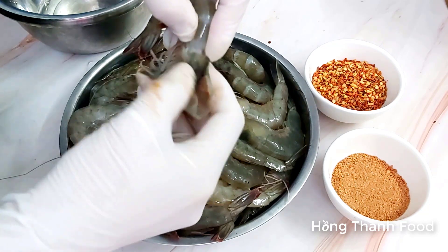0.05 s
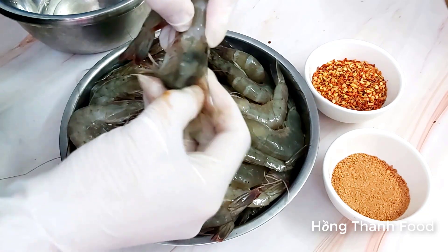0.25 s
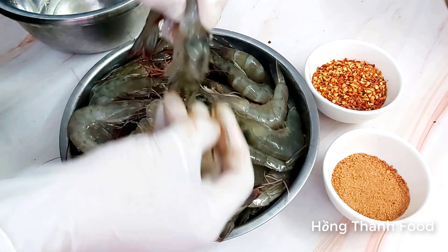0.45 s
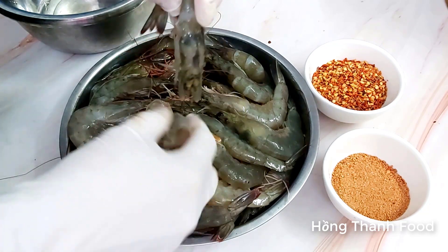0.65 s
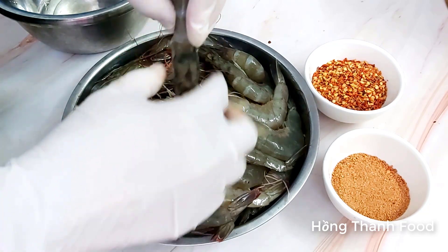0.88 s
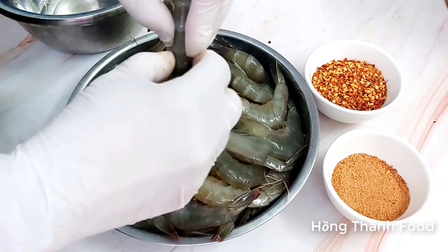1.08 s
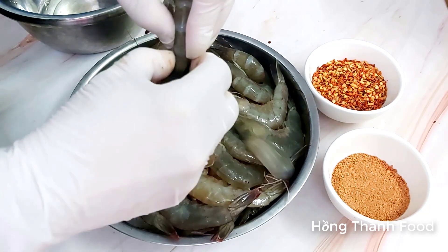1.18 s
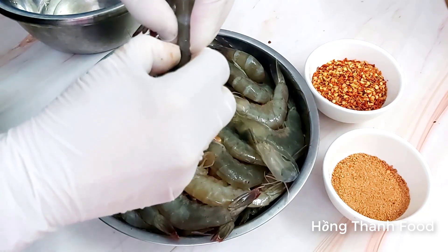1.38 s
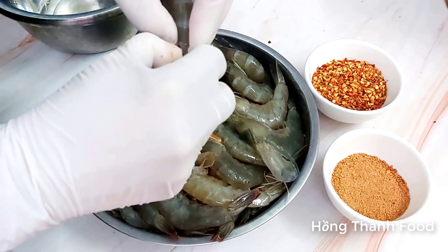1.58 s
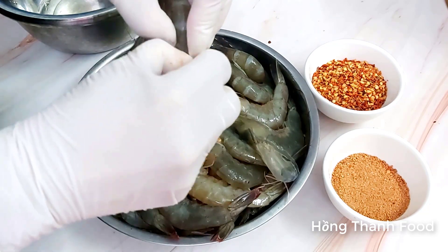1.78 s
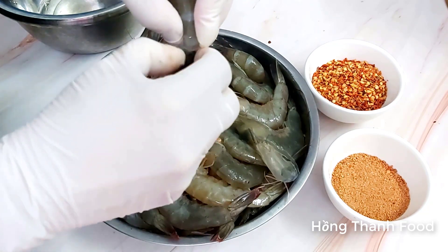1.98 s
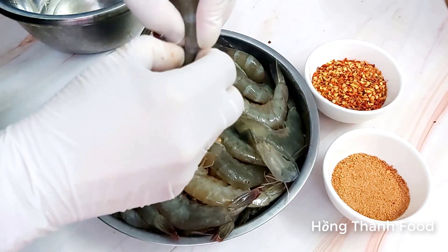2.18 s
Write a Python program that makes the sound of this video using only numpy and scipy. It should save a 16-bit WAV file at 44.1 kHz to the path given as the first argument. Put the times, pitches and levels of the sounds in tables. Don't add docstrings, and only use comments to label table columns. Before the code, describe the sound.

Raw shrimp shell cracks sharply as gloved hands twist the head off, then sparse tiny clicks

```python
import sys
import numpy as np
from scipy import signal
from scipy.io import wavfile

SR = 44100
rng = np.random.default_rng(int(sys.argv[2]) if len(sys.argv) > 2 else 0)


def master_out(mix):
    frames = np.transpose(np.atleast_2d(mix))
    ceiling = np.clip(frames, -1, 1)
    pcm = np.round(ceiling * 32767).astype(np.int16)
    wavfile.write(sys.argv[1], SR, pcm)


def voltage_ratio(decibels):
    exponent = np.asarray(decibels, float) / 20
    return 10 ** exponent


N = 99225


def rms_one(x):
    return x / np.sqrt(np.mean(x ** 2) + 1e-20)


def peak_one(x):
    return x / np.max(np.abs(x))


def at_hz(points, hz, column=1):
    points = np.array(points)
    return np.interp(np.log(hz), np.log(points[:, 0]), points[:, column])


def band(x, low_hz, high_hz):
    sos = signal.butter(2, [low_hz, min(high_hz, .47 * SR)], "band", fs=SR, output="sos")
    return signal.sosfilt(sos, x)


def drift(rate_hz):
    pole = np.exp(-80 * np.pi * rate_hz / SR)
    noise = rng.standard_normal(N // 40 + 2002)
    slow = signal.lfilter([1], [1, -2 * pole, pole * pole], noise)[2000:]
    return np.interp(np.arange(N) / 40, np.arange(len(slow)), rms_one(slow))


def ring(clicks, hz, t60_s):
    radius = voltage_ratio(-60 / (t60_s * SR))
    angle = 2 * np.pi * hz / SR
    return signal.lfilter([0, np.sin(angle)], [1, -2 * radius * np.cos(angle), radius ** 2], clicks + 1e-18)


def third_octaves(start_hz, octaves):
    edges_hz = start_hz * 2 ** np.arange(0, octaves, 1 / 3)
    return zip(edges_hz, edges_hz[1:])


# hz, density_db (per Hz)
AIR_SPECTRUM = [(30, -17.5), (120, -8), (350, -13), (700, -23.5), (2500, -32.5), (6000, -45.5),
                (13500, -32), (15800, -45)]
# hz, likeness (0-1)
AIR_LIKENESS = [(40, .5), (100, 0.95), (200, 0.54), (500, 0.22), (2000, .1), (12000, .05)]
# hz, level_db (rms)
HUM_LINES = [(50, -59), (102, -55), (127, -56.5)]


def air():
    level_db, flicker_db, hum_wobble_db = -47.5, .27, 3
    tone, together = 0, drift(2.5)
    white = rng.standard_normal((2, 2, N))
    for k, (low_hz, high_hz) in enumerate(third_octaves(25, 9.6)):
        mid, side = band(white[k % 2], low_hz, high_hz)
        hz = np.sqrt(low_hz * high_hz)
        alike = np.clip(at_hz(AIR_LIKENESS, hz), -1, 1)
        stereo = np.sqrt(1 + alike) * mid + np.sqrt(1 - alike) * side * [[1], [-1]]
        gain_db = at_hz(AIR_SPECTRUM, hz) + flicker_db * (together + drift(8))
        tone = tone + voltage_ratio(gain_db) * stereo
    hum, t = 0, np.arange(N) / SR
    for hz, line_db in HUM_LINES:
        height = voltage_ratio(line_db + 3 + hum_wobble_db * drift(6))
        hum = hum + height * np.sin(2 * np.pi * hz * t + .7 * drift(4))
    return voltage_ratio(level_db) * rms_one(tone) + hum


# time_s, level_db
FINGER_EFFORT = [(0, -64), (.15, -61.5), (.23, -80), (.285, -29), (0.318, -22), (.36, -39.5), (.45, -42.5),
                 (.52, -40), (0.558, -38), (.72, -63), (.85, -61), (1.17, -64.5), (1.24, -62), (1.34, -52),
                 (1.42, -89), (1.62, -74.5), (1.748, -67.5), (2.25, -87)]


def crackle():
    grains_per_s, spread_db, ring_cycles = 3000, 3.5, 4
    sizes = voltage_ratio(spread_db * np.minimum(rng.exponential(1, N), 5)) * rng.choice([-1, 1], N)
    born = rng.random(N) < grains_per_s * voltage_ratio(5 * drift(40)) / SR
    dealt = rng.integers(0, 12, N)
    grains = 0
    for k, hz in enumerate(np.geomspace(3000, 15000, num=12)):
        grains = grains + ring(sizes * born * (dealt == k), hz, ring_cycles / hz)
    effort_db = np.interp(np.arange(N) / SR, *np.transpose(FINGER_EFFORT))
    return voltage_ratio(effort_db) * rms_one(grains)


# start_s, level_db, rise_s, length_s
FAR_THUDS = [
    (.118, -43, 0.0081, 0.012),
    (0.301, -37.5, 0.018, 0.069),
    (0.855, -33, 0.059, 0.076),
]
# hz, width_hz, level_db
THUD_RESONANCES = [(117, 49, -1.5), (154.2, 10, -6.5), (265, 39, -5.5), (330, 47, -11), (394, 37, -11),
                   (490, 13, -16.5), (700, 27, -24), (843, 150, -17), (1095, 100, -18.5)]


def thuds():
    t60_s, side_db = .47, -8
    t, envelope = np.arange(N) / SR, 0
    for start_s, level_db, rise_s, length_s in FAR_THUDS:
        decay_db = -60 * np.maximum(t - start_s - length_s, 0) / t60_s
        envelope = envelope + voltage_ratio(level_db + decay_db) * np.clip((t - start_s) / rise_s, 0, 1)
    white, body = rng.standard_normal((2, N)), 0
    for hz, width_hz, level_db in THUD_RESONANCES:
        resonance = band(white, hz - width_hz / 2, hz + width_hz / 2)
        body = body + voltage_ratio(level_db) / np.sqrt(width_hz) * resonance
    mid, side = body
    return envelope * (rms_one(mid) + voltage_ratio(side_db) * rms_one(side) * [[1], [-1]])


# start_s, peak_db, ring_hz, body_db (re peak), top_db (re peak)
TWIST_SNAPS = [(.1657, -4.5, 4390, -28.5, -1), (.2172, -8, 1600, -12.5, -45.5), (.228, -2.5, 5000, -9, 6),
               (.2335, -16.5, 6000, -25.5, -10), (.2455, -7, 4000, -19, 0.5), (.257, -13, 5000, -16, -3.5),
               (.2725, -19.5, 5000, -16.5, -22.5), (.283, 4.5, 6800, -25, -39),
               (.2846, 8.5, 5300, -21.5, -4), (.296, 3.5, 6500, -45, -15.5),
               (.2995, -11.5, 6000, -34, -1.5), (.3095, 11.5, 7200, -68, 15.5), (.3127, 0, 7000, -29, -30),
               (.315, 2.5, 5500, -17.5, 13), (.368, -12, 5200, -28.5, -13.5),
               (.407, -10.5, 5900, -30.5, 15.5), (.437, -19.5, 7000, -26, -15.5)]
# start_s, peak_db, ring_hz, body_db (re peak), top_db (re peak)
PULL_SNAPS = [(.4574, -1, 6000, -26, 3), (.4593, -2, 9800, -28, 4), (.4611, -4, 7100, -30, 4),
              (.4697, -8, 6800, -24, 0), (.4737, 2, 6300, -16, -3), (.5008, 2, 9000, -10, 3),
              (.5022, -2.5, 6500, -24, 3), (.5034, -4, 6000, -26, 3), (.5078, -9, 6700, -30, 3),
              (.5172, -8, 6700, -30, 3), (.5236, -11, 6300, -26, -5)]
# start_s, peak_db, ring_hz, body_db (re peak), top_db (re peak)
PICK_SNAPS = [(.698, -20, 8800, -39, 14), (.7605, -19.5, 5840, -45, 3), (.7625, -13.5, 10700, -47, -27),
              (.775, -40, 9900, -30, -8), (1.0498, -19.5, 5850, -40, -26.5), (1.0587, -55, 9000, -26, 8),
              (1.1802, -19.5, 8900, -35, 7), (1.234, -25.5, 7500, -24, 13), (1.2405, -31, 9700, -10, 0),
              (1.2495, -31, 5040, -34, -7.5), (1.3103, -22.5, 5700, -15, -12), (1.325, -46, 7000, -18, -21),
              (1.3465, -31.5, 5300, -15, -21), (1.5955, -23.5, 8600, -27, 11),
              (1.6095, -30, 8660, -20, -14.5), (1.7, -33, 7500, -38, 2), (1.8547, -13, 6670, -19, -6),
              (1.856, -21, 4480, -36, -37), (1.8575, -22.5, 6350, -25, -29),
              (1.9525, -32.5, 6190, -35.5, -19)]


def snaps(table):
    snap_s, cracks_per_s, ring_cycles, tick_db = .0005, 10000, 9, -4
    out, t = np.zeros(N + SR), np.arange(512) / SR
    swell = (t / snap_s) * np.exp(1 - t / snap_s)
    for start_s, peak_db, ring_hz, body_db, top_db in table:
        chance, size = rng.random((2, len(t)))
        cracks = .4 * (chance < cracks_per_s / SR) * (2 * size - 1) * swell
        cracks[int(snap_s * SR / 2)] = 1
        plate = peak_one(ring(cracks, ring_hz, ring_cycles / ring_hz))
        body = peak_one(band(band(cracks, 800, 3300), 800, 3300))
        tick = peak_one(band(cracks, 2200, 10000))
        edge = peak_one(band(cracks, 9500, SR))
        burst = plate + voltage_ratio(body_db) * body + voltage_ratio(tick_db + top_db / 2) * tick - voltage_ratio(top_db) * edge
        start = int(start_s * SR)
        out[start:start + len(t)] += voltage_ratio(peak_db) * peak_one(burst)
    return out[:N]


# hz, t60_s, level_db
ROOM_DECAY = [(500, 0.42, -14.5), (1200, 0.19, -13), (2500, 0.14, 4.5), (3600, 0.19, 0), (5000, 0.27, 2.5),
              (7200, 0.24, 4), (11000, 0.14, 5), (15000, 0.17, 3.5)]


def kitchen(x):
    room_db, wall_s, build_s, echo_db = -2.5, .0125, .005, -15
    bowl_db, bowl_t60_s, table_db, table_t60_s = -1.5, .011, -13, .15
    t, room = np.arange(SR // 2) / SR, 0
    white = rng.standard_normal((4, 2, len(t)))
    for k, (low_hz, high_hz) in enumerate(third_octaves(250, 6.4)):
        hz = np.sqrt(low_hz * high_hz)
        gain_db = at_hz(ROOM_DECAY, hz, column=2) - 60 * t / at_hz(ROOM_DECAY, hz)
        room = room + band(white[k % 2], low_hz, high_hz) * voltage_ratio(gain_db)
    room = room * np.clip((t - wall_s) / build_s + 1, 0, 1) ** 2
    table = white[2] * voltage_ratio(-60 * t / table_t60_s) * np.clip(t / .00033, 0, 1)
    bowl = band(white[3], 4880, SR) * voltage_ratio(-60 * t / bowl_t60_s)
    reply = voltage_ratio(room_db) * rms_one(room) + voltage_ratio(table_db) * rms_one(table) + voltage_ratio(bowl_db) * rms_one(bowl)
    reply = reply / np.sqrt(len(t))
    reply[0, int(wall_s * SR)] += voltage_ratio(echo_db)
    reply[1, int(wall_s * SR * 1.04)] += voltage_ratio(echo_db)
    return signal.fftconvolve(x[None], reply, axes=1)[:, :N]


def scene():
    right_lag_s, pan_db = .000136, -.3
    room_send_db = (0, -2.5, .8)
    groups = np.array([snaps(TWIST_SNAPS), snaps(PULL_SNAPS), snaps(PICK_SNAPS)])
    wet = crackle()
    hands = groups.sum(axis=0) + wet
    lagged = np.roll(hands, int(round(right_lag_s * SR)))
    near = np.array([voltage_ratio(pan_db / 2) * hands, voltage_ratio(-pan_db / 2) * lagged])
    return near + kitchen(voltage_ratio(room_send_db) @ groups + wet) + thuds() + air()


def top_cut(x):
    return signal.sosfilt(signal.butter(12, 16100, fs=SR, output="sos"), x)


def record(dry):
    low_pass = signal.cheby2(10, 45, 20000, fs=SR, output="sos")
    mix = np.clip(signal.sosfilt(low_pass, dry), -1, 1)
    return top_cut(mix)


dry = scene()
out = record(dry)
master_out(out)
```